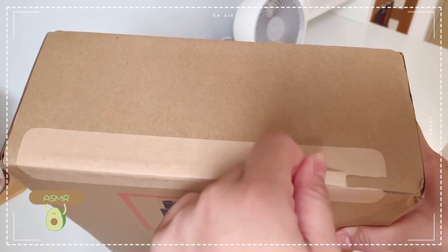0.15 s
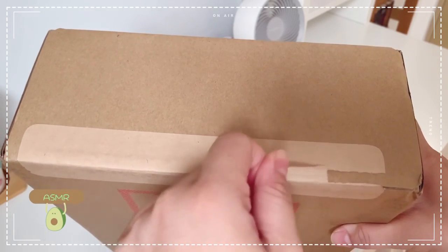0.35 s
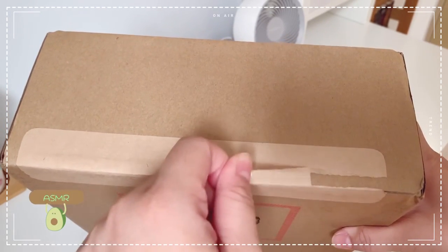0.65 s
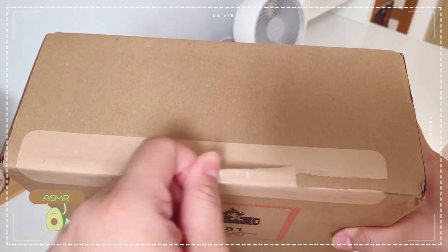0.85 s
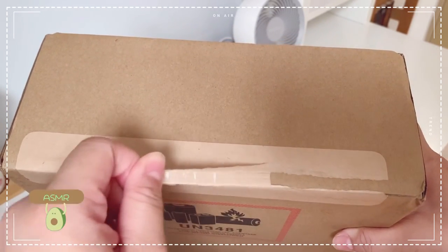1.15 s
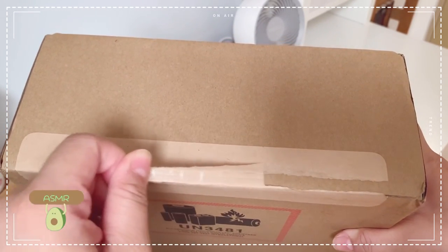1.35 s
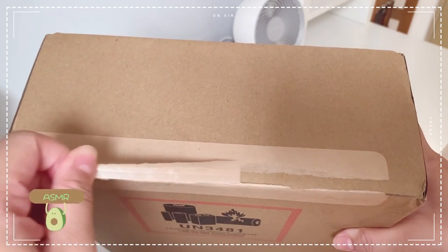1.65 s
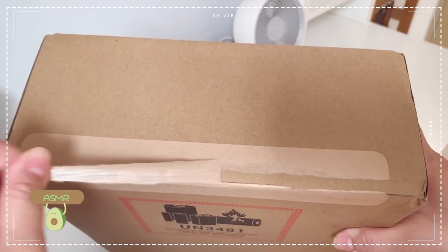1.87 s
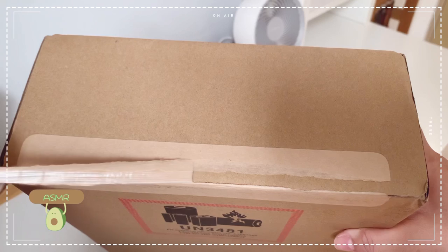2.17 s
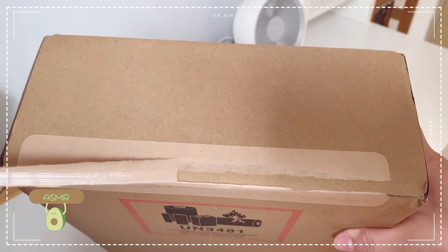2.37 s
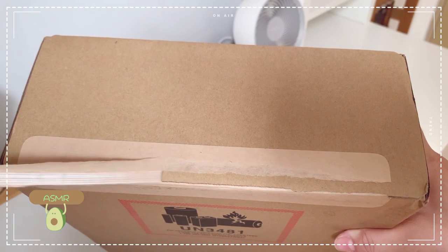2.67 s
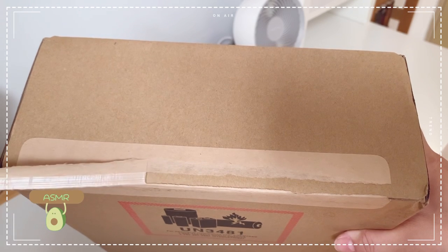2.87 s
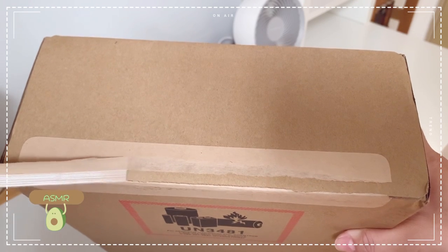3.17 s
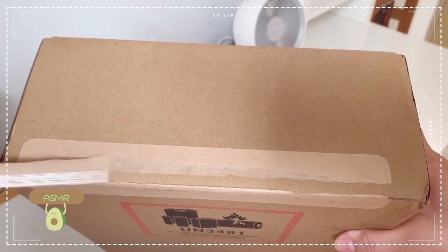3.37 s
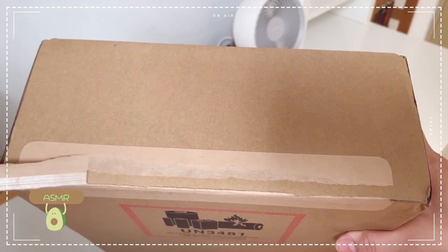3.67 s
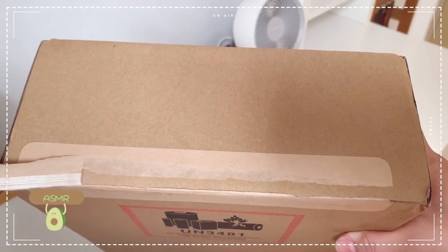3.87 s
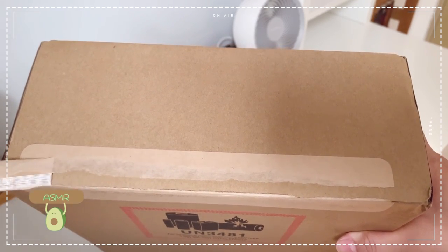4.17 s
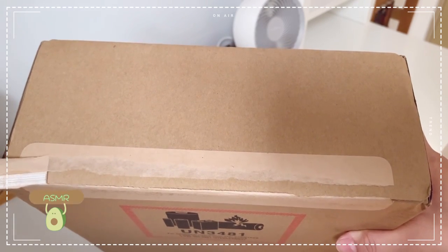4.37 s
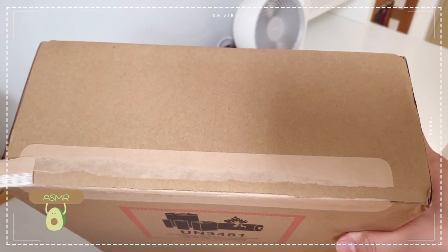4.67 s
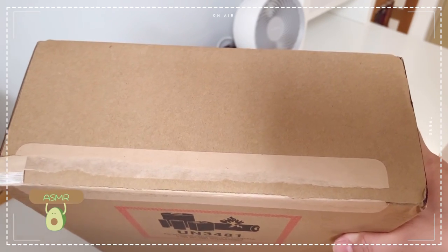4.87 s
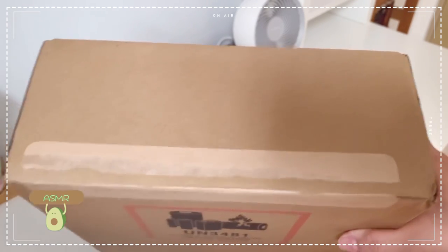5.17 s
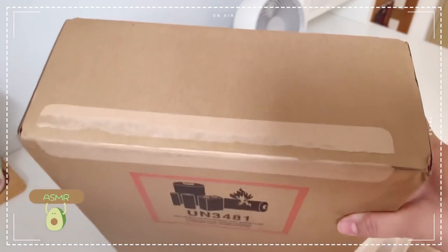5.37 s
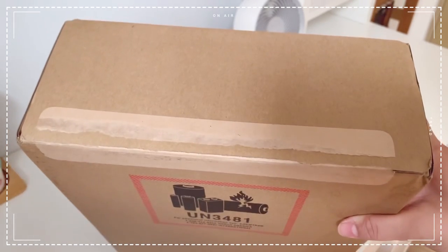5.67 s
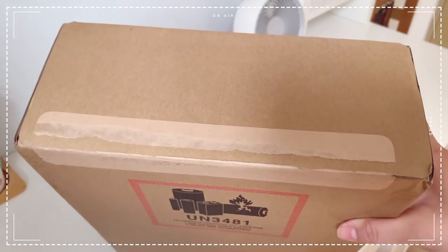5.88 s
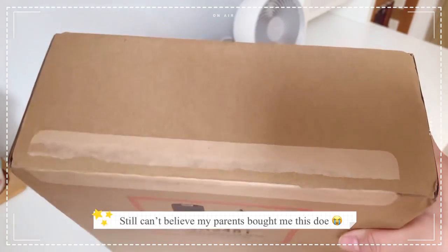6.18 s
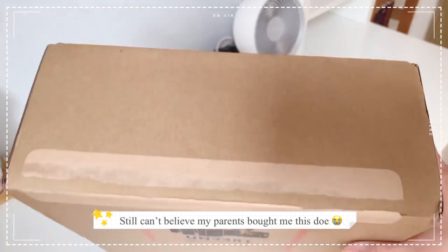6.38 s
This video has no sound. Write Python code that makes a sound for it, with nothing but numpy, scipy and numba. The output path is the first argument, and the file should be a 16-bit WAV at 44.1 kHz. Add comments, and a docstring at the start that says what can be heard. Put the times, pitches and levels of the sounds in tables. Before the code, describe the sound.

In a small quiet room, a fan drones low and steady. Up close, adhesive tape rips from a box edge in about twenty uneven pulls, grainy and crisp, with stray pops and a hollow cardboard undertone drifting from right to left. The last bit breaks loose with a sharp snap; after a near-quiet gap, a hand rubs and catches on the box in dry scrapes.

```python
"""Tape rips in short tugs along a cardboard box, with dull bumps and a desk fan humming behind.
Glue and paper fibres snap by the thousand: random clicks ring the film, the paper liner and the box.
At the far edge the strip snaps free with a twang; then skin rubs on the box and the loose strip rustles.
The fan is shaped noise, a wavering drone and steady sines; fading noise adds the echoes of a small room."""
import sys
import numpy as np
from scipy import signal
from scipy.fft import rfft, irfft, next_fast_len
from scipy.io import wavfile
from scipy.ndimage import uniform_filter1d, map_coordinates
from numba import njit

SR = 44100
rng = np.random.default_rng(int(sys.argv[2]) if len(sys.argv) > 2 else 0)


def digitize_waveform(pressure):
    """Quantize a signal to 16-bit integers and store it at the path in sys.argv[1].

    Rows of a 2-D input are taken as channels; values are limited to [-1, 1].
    """
    field = np.atleast_2d(pressure).T
    bounded = np.clip(field, -1, 1)
    quanta = np.round(bounded * 32767).astype(np.int16)
    wavfile.write(sys.argv[1], SR, quanta)


N = 287840
TIME = np.arange(N) / SR
FILM_Q = 0.9
FILM_LAG_S = 0.000214   # the treble reaches the left microphone this much later
EDGE_LEAD_S = 0.00019   # box sounds from the far edge reach the left microphone this much earlier

# tugs on the strip; level_db is the relative strength of the tearing, cardboard_db the extra for liner and panel:
# start_s, rise_s, hold_s, fall_s, level_db, cardboard_db
TUGS = [(0.0, 0.0014, 0.013, 0.17, -57.5, -0.5), (0.167, 0.062, 0.042, 0.14, -44, -2.5),
        (0.408, 0.059, 0.072, 0.12, -47, -1), (0.706, 0.052, 0.15, 0.24, -46.5, -2),
        (0.958, 0.035, 0.14, 0.1, -47.5, -1), (1.257, 0.088, 0.047, 0.67, -50, 0),
        (1.461, 0.031, 0.26, 0.38, -51, 1), (1.784, 0.097, 0.14, 0.14, -48, 0.5),
        (2.047, 0.021, 0.14, 0.14, -51.5, -1), (2.237, 0.024, 0.2, 0.084, -51.5, 1.5),
        (2.552, 0.083, 0.13, 0.17, -47, 1.5), (2.961, 0.046, 0.18, 0.076, -51.5, -1.5),
        (3.107, 0.017, 0.088, 0.13, -48.5, 1.5), (3.301, 0.043, 0.099, 0.046, -46, 2),
        (3.603, 0.035, 0.054, 0.03, -46, -1.5), (3.826, 0.1, 0.12, 0.17, -45.5, 0.5),
        (4.114, 0.012, 0.036, 0.069, -50, 0), (4.261, 0.048, 0.15, 0.03, -53.5, -1.5),
        (4.501, 0.038, 0.032, 0.13, -49, -1), (4.687, 0.023, 0.055, 0.044, -63, 0.5),
        (4.85, 0.12, 0.11, 0.044, -53.5, 3), (5.077, 0.012, 0.0048, 0.018, -45, 3)]
# hand and box bump together dully; level_db is the top of the swell:
# start_s, level_db, pitch_hz, decay_s
BUMPS = [(-0.015, -32.5, 65.3, 0.01), (0.065, -45.5, 59, 0.025), (0.12, -34.5, 99, .021),
         (0.167, -39, 58.7, .021), (0.304, -44.5, 109.6, 0.019), (0.684, -44, 166, 0.012),
         (0.701, -41, 64.7, .016), (1.727, -42, 63, 0.009), (2.612, -38.5, 64.7, 0.018),
         (2.77, -39, 70.8, 0.018), (3.018, -42, 60.8, 0.012), (3.134, -44.5, 62, 0.012),
         (5.087, -38.5, 112, 0.0174), (5.251, -55, 60, .06), (5.5, -53, 58, .05), (5.648, -46, 64.5, 0.014),
         (6.437, -49, 70, 0.011)]


def from_db(db):
    """Decibels to gain."""
    return 10 ** (np.asarray(db) / 20)


def rms_one(x):
    """Scale to an average power of 1."""
    return x / np.sqrt(np.mean(x ** 2) + 1e-20)


def in_time(rows):
    """Each column of a time curve, read sample by sample."""
    s, *columns = np.transpose(rows)
    return [np.interp(TIME, s, column) for column in columns]


def at_hz(points, size):
    """A table over pitch, read at the frequencies of an FFT."""
    hz, value = np.transpose(points)
    return np.interp(np.log(np.fft.rfftfreq(size, 1 / SR) + 1), np.log(hz), value)


def drift(rate_hz):
    """Slow random wandering with spread 1, made at a low sample rate and filled in."""
    step = 40
    r = np.exp(-2 * np.pi * rate_hz * step / SR)
    noise = rng.standard_normal(N // step + 2002)
    # the first part is dropped so that the filter has settled
    slow = signal.lfilter([1], [1, -2 * r, r * r], noise)[2000:]
    return np.interp(np.arange(N) / step, np.arange(len(slow)), rms_one(slow))


def colour(x, spectrum):
    """Filter with the given spectrum that never sounds ahead of its input (minimum phase)."""
    size = 2 * next_fast_len(N // 2 + SR // 10)
    cepstrum = irfft(np.log(from_db(at_hz(spectrum, size))))
    # folding the second half onto the first makes the response causal
    cepstrum[1:size // 2] *= 2
    cepstrum[size // 2 + 1:] = 0
    return irfft(rfft(x, size) * np.exp(rfft(cepstrum)))[..., :N]


@njit
def sweep(x, hz, q):
    """Band-pass resonance whose centre may move, with gain 1 on top."""
    out, band, low = np.zeros(len(x)), 0., 0.
    for i in range(len(x)):
        g = np.tan(np.pi * min(hz[i] / SR, .45))
        v = (band + g * (x[i] + 1e-18 - low)) / (1 + g * (g + 1 / q))
        band, low = 2 * v - band, low + 2 * g * v
        out[i] = v / q
    return out


def ring(clicks, hz, t60_s):
    """Each click sets off a sine, as high as the click, that fades by 60 dB in t60_s."""
    r = from_db(-60 / (t60_s * SR))
    w = 2 * np.pi * hz / SR
    return signal.lfilter([0, np.sin(w)], [1, -2 * r * np.cos(w), r * r], clicks + 1e-18)


def afterglow(clicks, decay_s):
    """Each click leaves an envelope of its own height that dies away."""
    return signal.lfilter([1], [1, -np.exp(-1 / (decay_s * SR))], clicks + 1e-18)


def clicks_at(rows):
    """One click for each row of time (s) and strength (dB)."""
    s, db = np.transpose(rows)
    return np.bincount((s * SR).astype(int), from_db(db), N)


def snaps(per_s, spread_db):
    """Random clicks of uneven size; their power stays even when their rate changes."""
    sizes = from_db(spread_db * np.minimum(rng.exponential(1, N), 4)) * rng.choice([-1, 1], N)
    happens = rng.random(N) < per_s / SR
    return rms_one(sizes * happens / np.sqrt(per_s))


def strokes(rows):
    """Each stroke builds up, holds, then dies away by 20 dB in its fall time."""
    power = 0
    for start, rise, hold, fall, db, *_ in rows:
        build = np.sin(np.pi / 2 * np.clip((TIME - start) / rise, 0, 1)) ** 2
        let_go = np.maximum(TIME - start - rise - hold, 0) / fall
        power = power + (build * from_db(db - 20 * np.minimum(let_go, 10))) ** 2
    return np.sqrt(power)


def ports(x, lead_s):
    """The left microphone hears the sound lead_s before the right (after it, if negative)."""
    left = map_coordinates(x, [(TIME + lead_s) * SR], order=5)
    return np.array([left, x])


def diffuse(size):
    """White stereo noise as two microphones hear it arriving from all round."""
    # likeness of left and right, from -1 (opposite) to 1 (same): pitch_hz, likeness
    likeness = [(60, 0.92), (140, 0.7), (300, 0.81), (420, 0.86), (520, -0.42), (680, -0.75), (950, -0.07),
                (1300, 0.097), (2200, -0.21)]
    alike = np.clip(at_hz(likeness, size), -.98, .98)
    mid, side = rfft(rng.standard_normal((2, size)))
    return irfft(np.sqrt(1 + alike) * mid + np.sqrt(1 - alike) * side * [[1], [-1]], size)


def room(x, early_db, early_t60_s, late_db, count=1):
    """Quick scatter from desk and box, then the room's tail, both made of fading noise.
    A travelling source passes through `count` places, each with other echoes."""
    room_t60_s = 0.29
    t = np.arange(SR // 3) / SR

    def fade(t60_s):
        after_direct = t > .0005
        return rms_one(from_db(-60 * t / t60_s) * after_direct) / np.sqrt(len(t))

    shape = np.hypot(from_db(early_db) * fade(early_t60_s), from_db(late_db) * fade(room_t60_s))
    out = np.zeros((2, N + len(t)))
    place = np.linspace(0, count - 1, N)
    for k in range(count):
        here = np.flatnonzero(np.abs(place - k) < 1)
        share = x[here] * np.cos(np.pi / 2 * (place[here] - k))   # crossfade between places
        heard = signal.fftconvolve(share[None], diffuse(len(t)) * shape, axes=1)
        out[:, here[0]:here[0] + heard.shape[1]] += heard
    return out[:, :N]


def fan():
    """Smooth air noise, a wavering drone from a narrow resonance, and steady motor lines."""
    # shape of the air noise: pitch_hz, relative level_db per Hz
    air_colour = [(25, -95), (45, -78), (100, -76), (135, -71), (180, -78), (310, -78), (400, -84),
                  (480, -82), (580, -89), (700, -87.5), (1150, -94.5), (2000, -100), (3500, -110),
                  (6000, -121), (15000, -129)]
    # relative loudness of the air noise: time_s, level_db
    air_level = [(0, -58), (1.5, -55.5), (4.5, -57), (6.53, -56)]
    # motor lines: pitch_hz, level_db (rms)
    motor = [(120, -61), (147, -64), (240, -66), (361, -72), (480, -83.5), (960, -78.5), (1173, -77.5)]
    level_db, = in_time(air_level)
    noise = rms_one(irfft(rfft(diffuse(N)) * from_db(at_hz(air_colour, N)), N))
    air = from_db(level_db + 6.0) * noise

    hum_hz, hum_width_hz, hum_db = 138.5, 26.3, -49   # width of each of two resonances in a row
    start_db, swell_s = -13.5, 1.76   # it starts softer and swells
    centre, q = np.full(N, hum_hz), hum_hz / hum_width_hz
    drone = rms_one(sweep(sweep(rng.standard_normal(N), centre, q), centre, q))
    # it flutters quickly but keeps its mean strength
    drone /= np.sqrt(uniform_filter1d(drone ** 2, size=SR // 4))
    hum = from_db(hum_db + start_db * np.exp(-TIME / swell_s)) * drone

    lines = 0
    for hz, db in motor:
        wobbling_hz = hz + .5 * drift(rate_hz=2.16)
        lines = lines + from_db(db) * np.sqrt(2) * np.sin(2 * np.pi * np.cumsum(wobbling_hz) / SR)
    return air + hum + lines


def film(x, hz, q):
    """The taut strip rings for a few cycles, high up: two resonances in a row, then its colour."""
    # colour of the film: pitch_hz, level_db
    film_colour = [(3000, -10.5), (6500, -7), (8500, 1.5), (10000, 1.5), (12500, -2.5), (15600, 5)]
    return colour(sweep(sweep(x, hz, q), hz, q), film_colour)


def box_modes(push):
    """The cardboard box rings at its own pitches when pushed."""
    # ways the box can ring: pitch_hz, relative level_db, t60_s
    modes = [(146.5, -7, 0.61), (240.7, -8, 0.31), (329.2, -5, 0.062), (514, -4.5, 0.02),
             (797, -5.5, 0.022), (1123, -4, 0.0082), (1350, -4.5, 0.0069), (1790, -1, 0.0049),
             (2263, -6.5, 0.0078), (3700, -17, 0.0031)]
    return sum(from_db(db) * ring(push, hz, t60_s) for hz, db, t60_s in modes)


def sliding():
    """Skin rubs and catches on the cardboard as the box is turned, and the loose strip rustles."""
    # the box slides in the hand: start_s, rise_s, hold_s, fall_s, relative level_db
    rubs = [(5.71, .015, 0.018, 0.19, -72), (5.825, 0.0077, 0.053, 0.29, -62.5),
            (6.07, 0.015, 0.18, 0.22, -66.5), (6.22, 0.02, 0.22, 0.19, -62)]
    # colour of the rubbing: pitch_hz, level_db
    rub_colour = [(120, 0), (230, 19), (380, 2), (700, 18), (1400, 10.5), (2500, 9.5), (4400, 0.5),
                  (6000, -5), (10000, -10), (15500, -39)]
    # the skin catches and slips with a short scrape: time_s, relative level_db
    catches = [(5.846, -57), (6.147, -67), (6.275, -56), (6.355, -65), (6.451, -63)]
    # colour of those scrapes: pitch_hz, level_db
    catch_colour = [(500, -13), (900, 3), (1350, 11), (1900, 4), (2600, 4), (4400, -18), (10000, -14),
                    (15500, -30)]
    # a finger drags with a faint squeak: start_s, rise_s, hold_s, fall_s, relative level_db
    squeak = [(5.5, 0.029, 0.22, .08, -83)]
    # the loose strip rustles: start_s, rise_s, hold_s, fall_s, relative level_db
    rustle = [(5.362, .004, .005, 0.065, -70), (5.82, 0.014, 0.043, 0.11, -83), (6.18, .03, .03, .1, -86),
              (6.33, 0.015, 0.075, .06, -74.5)]
    # the negative spread makes some grains weaker than the rest
    grains = snaps(np.full(N, 2000.), spread_db=-1.0)
    grains = grains * from_db(2.2 * drift(rate_hz=25))   # uneven scuffing, spread 2.2 dB
    rub = strokes(rubs) * rms_one(colour(grains, rub_colour))
    rub += afterglow(clicks_at(catches), decay_s=0.011) * rms_one(colour(grains, catch_colour))
    rub += strokes(squeak) * rms_one(ring(grains, hz=4320, t60_s=0.044))
    rub += strokes(rustle) * rms_one(film(grains, np.full(N, 12900.), FILM_Q))
    direct = from_db(-3.0) * ports(rub, -FILM_LAG_S)
    return direct + room(rub, early_db=-5.5, early_t60_s=0.027, late_db=-11.5, count=48)


def knocks():
    """The soft contact of each bump after the start reaches mostly the lowest modes of the box."""
    delay_s, gain_db = 0.0079, -10.5
    push = clicks_at([(s + delay_s, db + gain_db) for s, db, *_ in BUMPS if s > 0])
    push = signal.sosfilt(signal.butter(2, 300, fs=SR, output="sos"), push + 1e-18)   # soft: low-pass
    return ports(box_modes(push), EDGE_LEAD_S)


def bumps(rise_s):
    """Soft pushes rock the box for a few cycles; the two sides do not move quite alike."""
    out = np.zeros((2, N))
    for s, db, hz, decay_s in BUMPS:
        t = np.maximum(TIME[:round((s + .5) * SR)] - s, 0)
        swell = (1 - np.exp(-t / rise_s)) ** 2 * np.exp(-t / decay_s)
        rock = np.sin(2 * np.pi * hz * t)
        twist = 0.5 * np.sin(2 * np.pi * 0.73 * hz * t) * [[1], [-1]]   # opposite left and right
        out[:, :len(t)] += from_db(db) * swell / swell.max() * (rock + twist)
    return out


def last_snap():
    """The strip comes off the edge with a short rip and a twang; the released box recoils and rings."""
    # last bond breaking: time_s, relative crack_db, relative jolt_db (push on the box)
    breaks = [(5.083, -42, -52), (5.0882, -38, -58), (5.093, -28.5, -39), (5.093, -45, -46),
              (5.0978, -54, -35)]
    bond = clicks_at([(s, crack_db) for s, crack_db, _ in breaks])
    recoil = clicks_at([(s, jolt_db) for s, _, jolt_db in breaks])
    body = from_db(-5.5) * box_modes(recoil)
    twang = from_db(-7) * ring(bond, hz=4840, t60_s=0.011)
    rip_noise = snaps(np.full(N, 8000.), spread_db=3.5)
    rip = bond + from_db(-20) * afterglow(bond, decay_s=.003) * rip_noise
    # pitch_hz, level_db
    crack = colour(rip, [(300, 13), (1500, 4.7), (4700, 10.5), (7000, 10.3), (10000, 11), (15000, 2.0)])
    direct = ports(body, EDGE_LEAD_S) + ports(crack + twang, -FILM_LAG_S)
    return direct + room(body + crack, early_db=-12.0, early_t60_s=0.0057, late_db=-4.0)


def small_ticks(effort):
    """Weak fibres let go at random moments, more often and harder under a stronger pull."""
    per_s, level_db, spread_db = 90, -46, 4   # rate and strength at the hardest pull
    sizes = from_db(level_db + spread_db * np.clip(rng.standard_normal(N), -2, 2))
    happens = rng.random(N) < per_s * np.sqrt(effort) / SR
    return sizes * np.sqrt(effort) * happens


def stick_slip(effort):
    """The glue holds and gives way in tiny jerks, each a burst of snaps; a hard pull runs more smoothly."""
    slips_per_s, slip_decay_s = 480, .0011
    steady_share = 1.6   # even tearing at the hardest pull, relative to one jerk
    gaps_s = rng.gamma(2, .5 / slips_per_s, round(2 * slips_per_s * N / SR))
    sizes_db = 2.5 * np.clip(rng.standard_normal(len(gaps_s)), -2, 2)
    jerks = np.column_stack([np.cumsum(gaps_s), sizes_db])
    jerks = jerks[jerks[:, 0] < TIME[-1]]
    flow = steady_share * effort ** .4 + afterglow(clicks_at(jerks), slip_decay_s)
    return flow / np.sqrt(uniform_filter1d(flow ** 2, size=SR // 20))   # even out the slower changes


def cardboard_grip():
    """Gain of liner and panel: some tugs shake the cardboard more than others."""
    start, *_, db = np.transpose(TUGS)
    current = np.maximum(np.searchsorted(start, TIME) - 1, 0)
    return from_db(uniform_filter1d(db[current], size=SR // 25))


def paper_liner(fibres, hz):
    """Snapping fibres ring the paper in two broad resonances that follow its moving pitch."""
    # broad resonances: multiple of the moving pitch, q, level_db
    resonances = [(.74, 1.4, -1), (1.15, 1.4, 1)]
    drive = sweep(fibres, hz, 1.0)
    paper = 0
    for k, (ratio, q, db) in enumerate(resonances):
        paper = paper + (-1) ** k * from_db(db) * sweep(drive, ratio * hz, q)
    return rms_one(paper)


def box_panel(fibres):
    """The same snaps ring the box wall, more softly in the treble."""
    # pitch_hz, level_db
    panel_colour = [(150, -10.0), (330, 4), (750, -0.5), (1250, 6), (2400, 0.5), (4500, -25.0)]
    return rms_one(colour(box_modes(fibres), panel_colour))


def tearing():
    """A harder pull breaks more fibres a second; each snap rings film, liner and box panel."""
    # the tear travels from right to left: time_s, film_hz, liner_hz, liner_db (relative)
    travel = [(0.2, 11800, 3570, -2.5), (0.85, 11730, 3400, -2.5), (1.5, 10640, 4000, -10),
              (2.5, 9900, 4800, -10), (3.4, 10000, 5060, -6.5), (4.4, 10830, 4480, -7),
              (5.05, 10600, 4420, -8.5)]
    # as it goes, it reaches the left microphone ever earlier: time_s, lead_s
    lead = [(0, 0), (1.5, .00011), (3, .00022), (5.1, .00029)]
    # the strongest fibres letting go: time_s, relative level_db
    strong_fibres = [(0.0278, -33.5), (0.0556, -34.5), (0.0904, -28.5), (0.0956, -44), (0.1253, -30),
                     (0.1524, -35.5), (0.1715, -32), (0.1747, -25), (0.3226, -26.5), (0.3498, -38),
                     (0.3686, -39.5), (0.3888, -30), (0.4127, -25.5), (0.4184, -24.5), (0.4466, -27.5),
                     (0.4728, -28), (0.5527, -23), (0.6122, -30), (0.6333, -36.0), (0.6371, -34),
                     (0.6433, -36), (0.6805, -29), (0.7009, -26), (0.7451, -27), (0.7979, -22.5),
                     (0.8243, -17), (0.9316, -30), (1.0273, -30), (1.1944, -32.5), (1.2472, -29.5),
                     (1.2691, -29), (1.2795, -31), (1.3131, -30), (1.3796, -22.5), (1.5251, -26),
                     (1.6125, -24), (1.7862, -39), (1.9728, -24.9), (2.0881, -29), (2.2035, -25.5),
                     (2.248, -26), (2.4571, -26), (2.464, -32.5), (2.4747, -27), (2.4958, -34.6),
                     (2.5821, -30), (2.5912, -33), (2.9118, -35), (2.9204, -33.5), (2.9239, -33),
                     (2.9582, -35.5), (2.9853, -32), (3.0022, -33), (3.0523, -29.6), (3.131, -22.5),
                     (3.1843, -19.5), (3.2366, -24), (3.2554, -33), (3.321, -30), (3.4811, -33.5),
                     (3.529, -37.5), (3.572, -34.5), (3.5771, -33), (3.6089, -19), (3.7922, -43),
                     (3.8385, -29.5), (3.8541, -24.5), (3.8984, -27), (4.0796, -24.5), (4.1106, -35),
                     (4.1957, -34), (4.2071, -33), (4.2587, -36), (4.2879, -34.1), (4.3046, -25.6),
                     (4.3476, -34), (4.3529, -36.5), (4.3702, -29), (4.3797, -22.5), (4.4078, -25),
                     (4.4264, -23), (4.4786, -37.5), (4.495, -31), (4.5018, -31), (4.5275, -29.5),
                     (4.575, -34), (4.6188, -29.5), (4.6314, -34.8), (4.6435, -34.5), (4.6511, -40),
                     (4.6933, -37), (4.7016, -32), (4.7393, -33), (4.7552, -34), (4.8229, -36),
                     (5.0388, -31.9), (5.3652, -39.5)]
    film_hz, liner_hz, liner_db = in_time(travel)
    lead_s, = in_time(lead)

    # between tugs the taut strip still creeps, until it comes free
    creep_db, creep_until_s = -68, 5.1
    taut = TIME < creep_until_s
    pull = np.hypot(strokes(TUGS), from_db(creep_db) * taut)
    pull = pull * from_db(0.95 * drift(rate_hz=16))   # the glue holds unevenly, spread 0.95 dB
    effort = pull / pull.max()
    per_s = 7000 * effort ** .8 + 1100
    fibres = snaps(per_s, spread_db=1.4) * stick_slip(effort)
    strong = clicks_at(strong_fibres)
    ticks = strong + taut * small_ticks(effort)

    # the tear stalls on a strong fibre (a decay run backwards in time),
    # which then gives way and takes its neighbours with it
    stall = np.minimum(afterglow(np.sign(strong)[::-1], decay_s=0.00098)[::-1], 1)
    crumble = from_db(-27.5) * afterglow(ticks, decay_s=.01)
    force = np.hypot(pull * from_db(1.02 - 11.0 * stall), crumble)

    hiss = rms_one(film(fibres, film_hz, FILM_Q))
    bright = force * hiss + from_db(6) * film(ticks, film_hz, 1.2)

    # the paper liner goes on creaking under a light pull, so it fades less than the film
    creak = force * (force / force.max()) ** -.12
    liner = creak * from_db(liner_db - 8.0) * paper_liner(fibres, liner_hz)
    liner += from_db(-8.0) * sweep(ticks, liner_hz, 0.38)
    panel = force * from_db(-12) * box_panel(fibres)
    body = cardboard_grip() * (liner + panel)

    # the film's hiss always reaches the right microphone first;
    # liner and panel move with the tear and scatter off the desk
    film_sound = ports(bright, -FILM_LAG_S)
    film_sound += room(bright, early_db=-12, early_t60_s=.012, late_db=-17, count=14)
    body_sound = from_db(-1.5) * ports(body, lead_s)
    body_sound += room(body, early_db=-1.0, early_t60_s=0.051, late_db=-11.0, count=60)
    return film_sound + body_sound


def scene():
    """Fan, box and tape together."""
    return fan() + sliding() + knocks() + bumps(rise_s=0.0088) + last_snap() + tearing()


def record(dry):
    """The microphones colour each side, drop the deepest bass and cut the top."""
    # the two microphones differ a little: pitch_hz, left minus right in dB
    balance = [(60, 2.5), (130, -1.5), (380, -4), (700, 1.5), (1100, 1), (2400, 0.5), (5200, -1.5),
               (8000, 0)]
    size = 2 * next_fast_len(N // 2 + SR // 10)
    half_each = at_hz(balance, size) * [[.5], [-.5]]
    dry = irfft(rfft(dry, size) * from_db(half_each))[:, :N]
    dry = signal.sosfilt(signal.butter(4, 36, "high", fs=SR, output="sos"), dry)
    return signal.sosfilt(signal.ellip(10, .2, 80, 15750, fs=SR, output="sos"), dry)


dry = scene()
out = record(dry)
digitize_waveform(out)
```